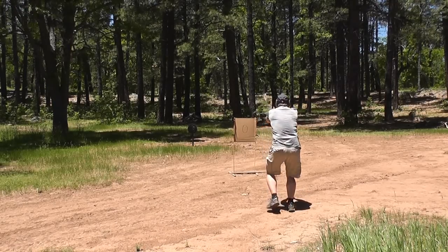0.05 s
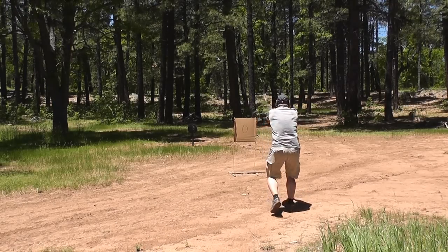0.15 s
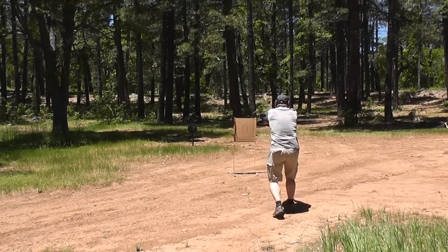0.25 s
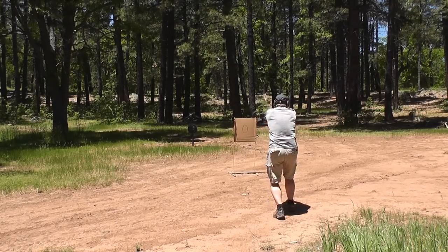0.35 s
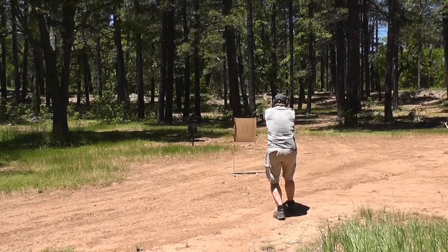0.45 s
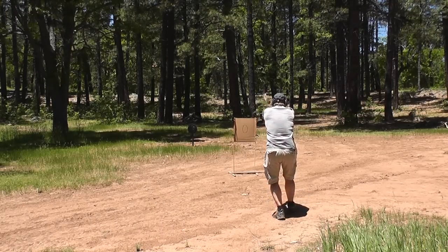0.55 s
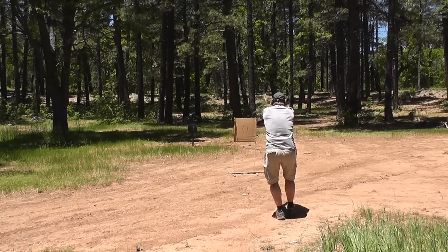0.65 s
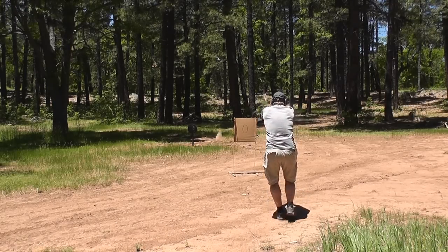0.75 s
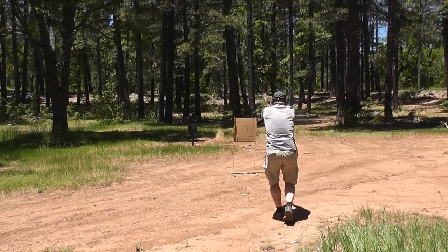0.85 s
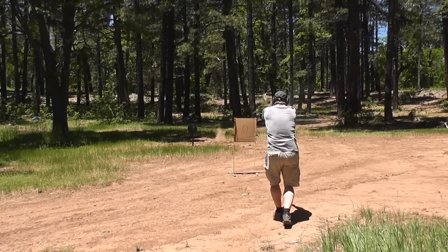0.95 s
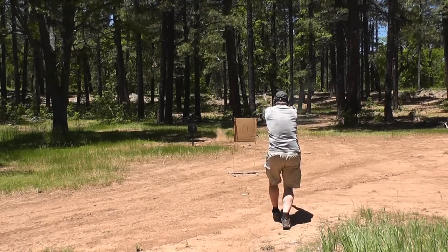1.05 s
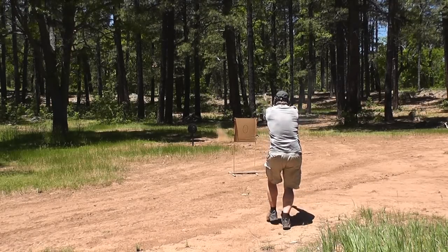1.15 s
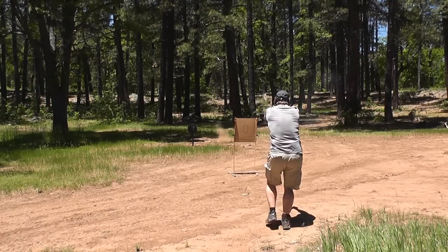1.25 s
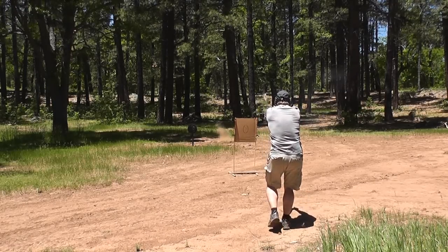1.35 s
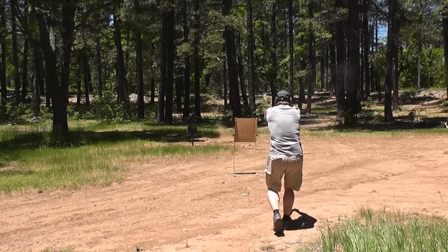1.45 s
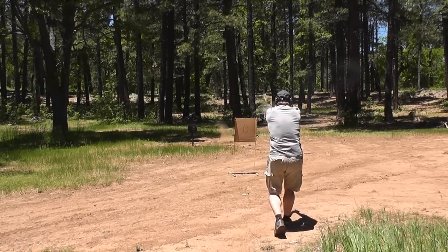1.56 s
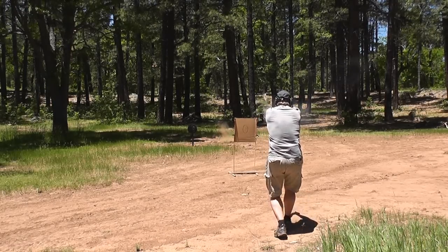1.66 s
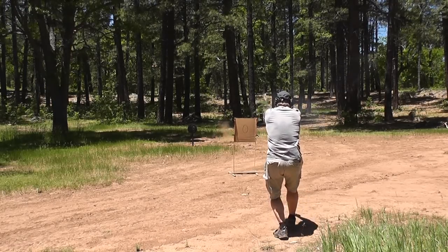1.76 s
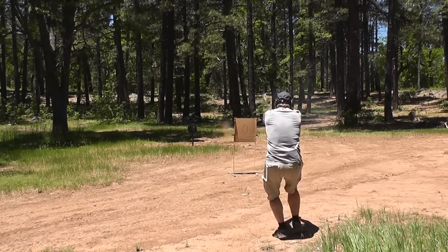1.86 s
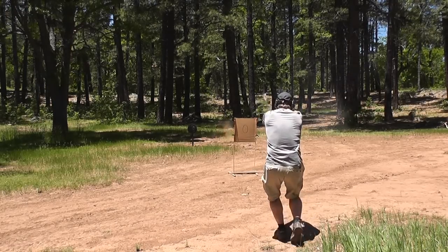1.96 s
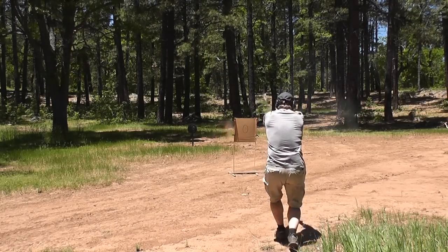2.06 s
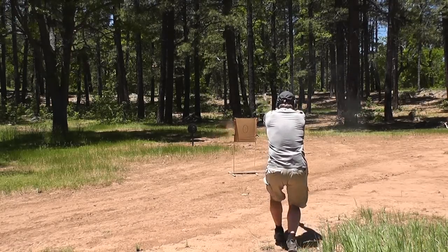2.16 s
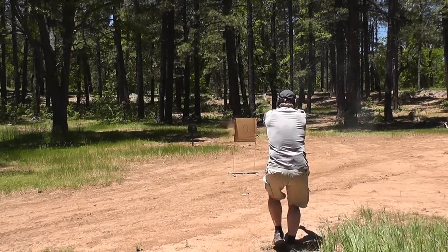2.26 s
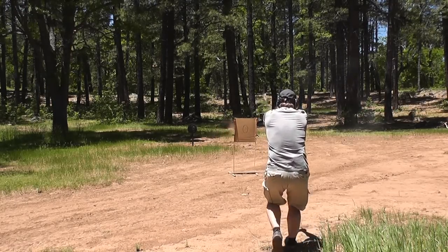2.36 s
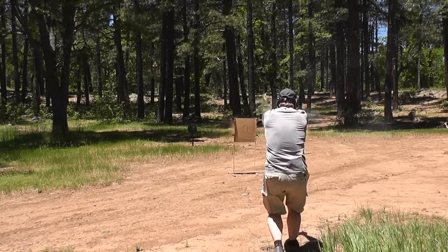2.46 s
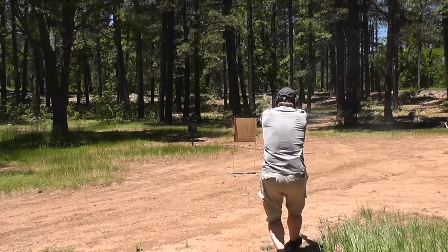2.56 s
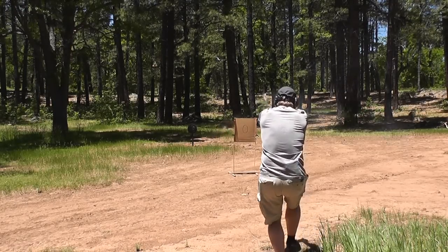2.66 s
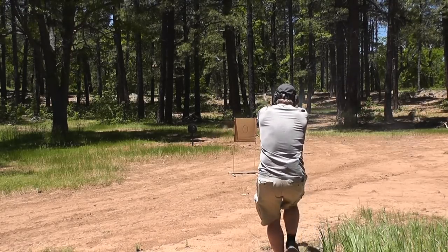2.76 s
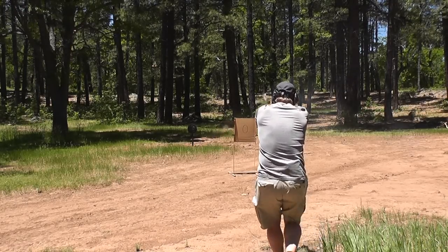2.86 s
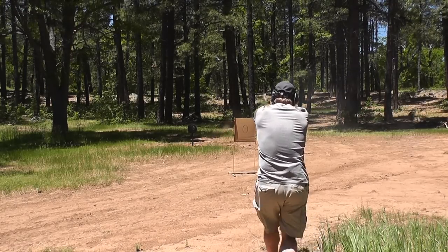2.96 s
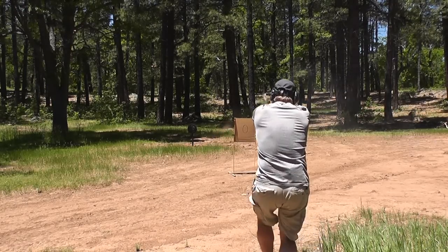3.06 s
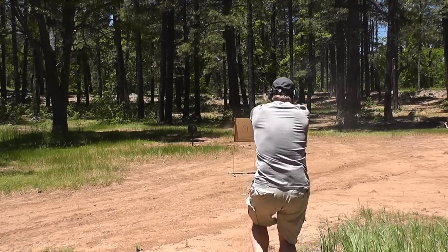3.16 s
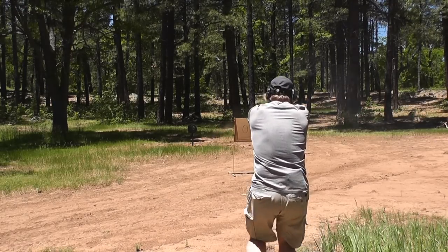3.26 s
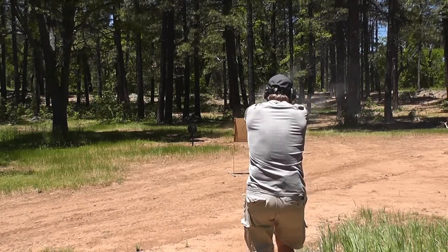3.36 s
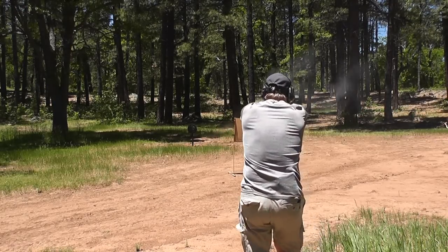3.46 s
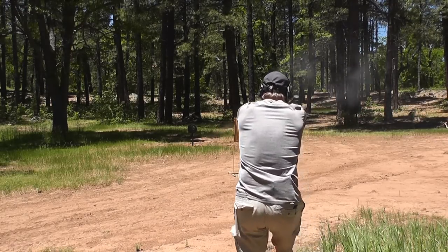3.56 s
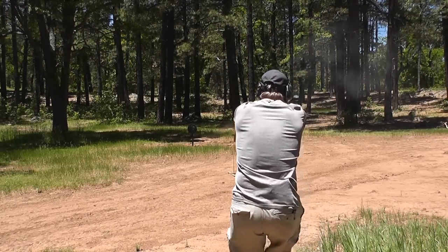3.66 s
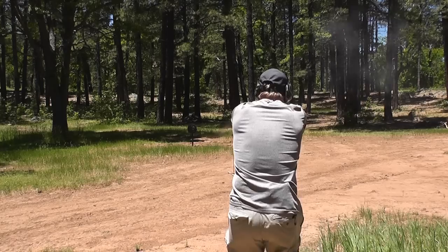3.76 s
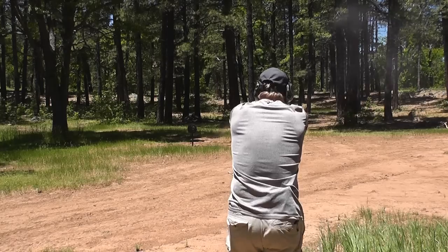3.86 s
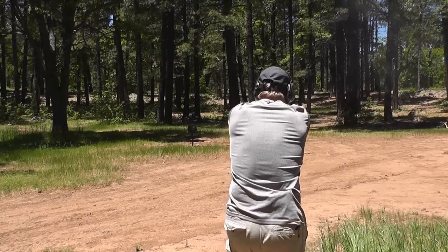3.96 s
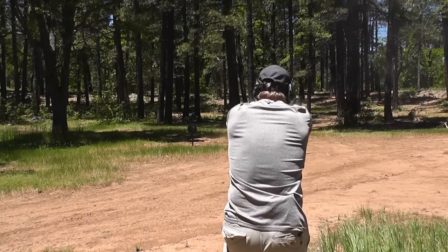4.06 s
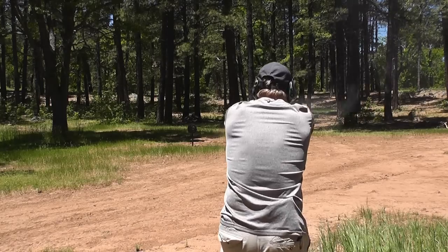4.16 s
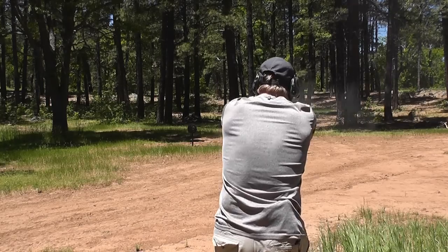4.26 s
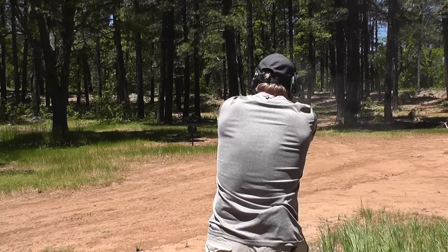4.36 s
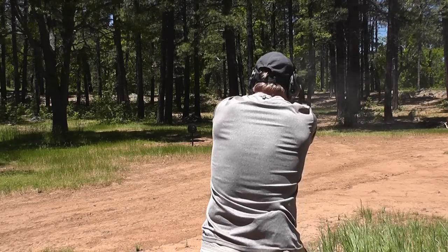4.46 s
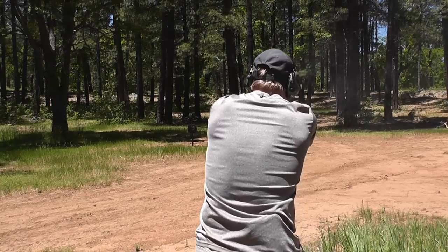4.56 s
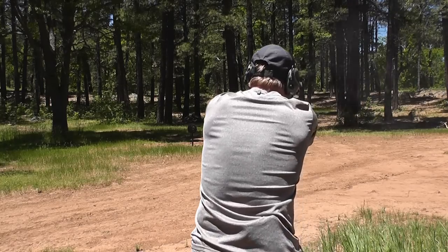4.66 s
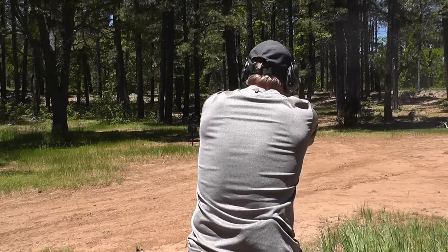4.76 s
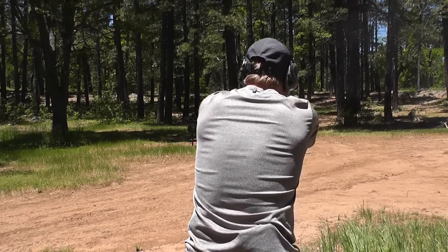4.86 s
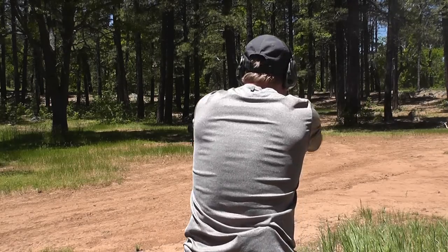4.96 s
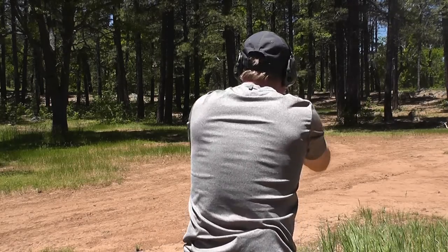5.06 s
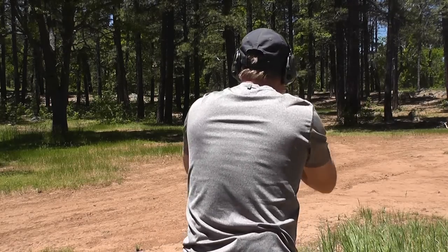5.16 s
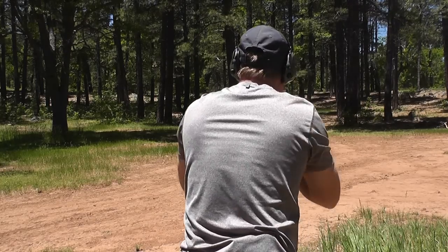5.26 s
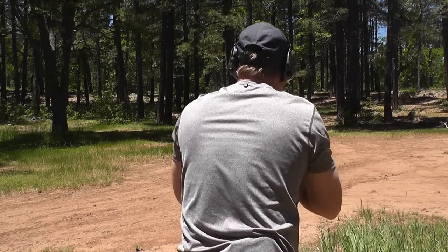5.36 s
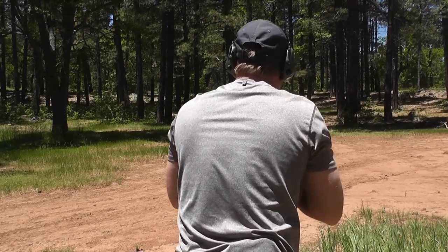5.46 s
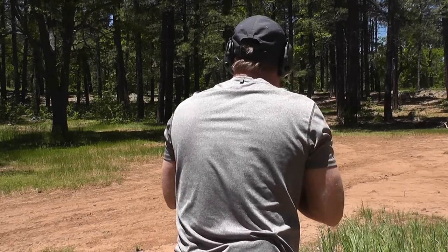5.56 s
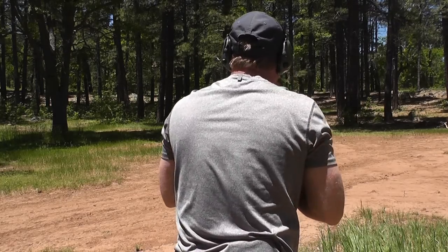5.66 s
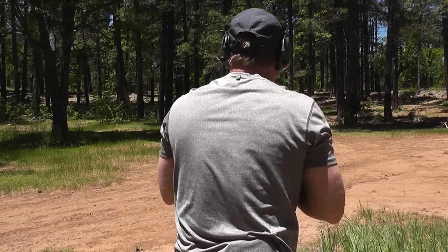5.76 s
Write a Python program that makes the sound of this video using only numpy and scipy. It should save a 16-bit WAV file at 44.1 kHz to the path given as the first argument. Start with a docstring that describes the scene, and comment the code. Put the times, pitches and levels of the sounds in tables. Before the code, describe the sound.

Five loud, evenly paced handgun shots crack outdoors and roll away through the trees, followed by soft steps on dirt and rustling clothes.

```python
"""A small revolver is fired five times by a man walking backwards over a dirt range in a pine forest.
Each blast overloads the microphone. The target board reflects it first; then the trunks scatter it
into a long roar, which darkens as air and ground absorb the treble. Between the shots his shoes
crush grit and his clothes rustle; a small bird twitters once over the wind in the trees."""
import sys
import numpy as np
from scipy import signal
from scipy.fft import rfft, irfft, next_fast_len
from scipy.io import wavfile
from scipy.ndimage import uniform_filter1d

SR = 44100
rng = np.random.default_rng(int(sys.argv[2]) if len(sys.argv) > 2 else 0)


def unload_wav(signal):
    """Save mono or channel-first audio to the path in sys.argv[1] as 16-bit WAV at rate SR, clipped to [-1, 1]."""
    wavfile.write(
        sys.argv[1],
        SR,
        np.round(np.clip(np.atleast_2d(signal).T, -1, 1) * 32767).astype(np.int16),
    )


N = 256088
SOUND_M_PER_S = 343
ECHO_LEAD_S = .003  # an echo's waveform begins this long before its centre

# Spectrum of rubbing grit and cloth. Each row: frequency in Hz, relative spectral level in dB.
FRICTION_SPECTRUM = [(300, -1), (1500, 10), (2500, 2), (4000, -6.5), (6200, 2), (8000, -4), (10000, -2),
                     (14000, -7.5), (16000, -11)]
# Stereo width of scattered sound. Each row: frequency in Hz, side level against mid in dB.
DIFFUSE_WIDTH = [(60, 18), (130, 6), (300, -12.5), (1000, -7.5), (2400, -8), (4400, -14.5), (8000, -31.5),
                 (14000, -1)]


def amp(db):
    return 10 ** (np.asarray(db) / 20)


def unit_rms(x):
    return x / np.sqrt(np.mean(x ** 2) + 1e-20)


def clock(seconds):
    return np.arange(int(seconds * SR)) / SR


def add(mix, start_s, sound):
    """Superposition: a mono or stereo sound sums into the mix."""
    part = mix[:, max(round(start_s * SR), 0):][:, :sound.shape[-1]]
    part += sound[..., :part.shape[1]]


def curve_at(points, hz):
    """Linear interpolation over log frequency."""
    knots_hz, values = np.transpose(points)
    return np.interp(np.log(hz + 1), np.log(knots_hz + 1), values)


def colour(x, spectrum):
    """Zero-phase filtering by a gain curve in dB."""
    size = next_fast_len(x.shape[-1] + 1024)
    gain = amp(curve_at(spectrum, np.fft.rfftfreq(size, 1 / SR)))
    return irfft(rfft(x, size) * gain, size)[..., :x.shape[-1]]


def band(x, low_hz, high_hz, order=2):
    """Causal band-pass filtering."""
    edges_hz = [low_hz, min(high_hz, SR / 2 - 500)]
    return signal.sosfilt(signal.butter(order, edges_hz, "band", fs=SR, output="sos"), x)


def spread(pair, width):
    """Mid-side stereo: the sum and difference of two unrelated signals give left and right."""
    mid, side = pair[0], colour(pair[1], width)
    return np.array([mid + side, mid - side])


def noise(samples, spectrum, width):
    """Partly coherent stereo noise of a given spectrum."""
    return colour(spread(rng.standard_normal((2, samples)), width), spectrum)


def snap(hz, fade_s):
    """A tiny fracture radiates a damped burst of noise around hz; peak 1."""
    t = clock(.02)
    wave = band(rng.standard_normal(len(t)) * np.exp(-t / fade_s), hz * .72, hz * 1.83)
    return wave / abs(wave).max()


def wind(buffet_db=-61.5, gust_db=13, gust_at_s=2.34, gust_width_s=.33, lump_db=3):
    """Turbulence: a steady rush in the pines, and light buffeting of the microphone with one gust."""
    # The rush. Each row: frequency in Hz, spectral level in dB.
    rush_spectrum = [(25, -72), (70, -46.5), (140, -35.5), (350, -31.5), (750, -29.5), (1200, -36.5),
                     (2000, -46.5), (3200, -51.5), (6000, -59.5), (10000, -65.5), (16000, -67.5)]
    # Its stereo width. Each row: frequency in Hz, side level against mid in dB.
    rush_width = [(60, 12), (200, -5), (500, -11.5), (4000, -11.5), (15000, -58)]
    t = np.arange(N) / SR
    lumps = unit_rms(band(rng.standard_normal(N), 8.2, 29, order=1))
    gust = np.exp(-((t - gust_at_s) / gust_width_s) ** 2)
    buffet = unit_rms(band(rng.standard_normal((2, N)), 82, 130, order=1))
    buffet *= amp(buffet_db + gust_db * gust + lump_db * lumps)
    return noise(N, rush_spectrum, rush_width) + buffet


def clothes(rustle_db=-86, growth_db_per_s=4.3, arms_db=-50, arms_at_s=4.95, fold_db=2, crackle_db=3):
    """Friction: cloth rubs in uneven folds, louder as he nears and most while he lowers his arms."""
    t = np.arange(N) / SR
    folds = unit_rms(band(rng.standard_normal(N), 5.6, 20, order=1))
    crackle = unit_rms(uniform_filter1d(rng.standard_normal(N), size=60))
    since = np.maximum(t - arms_at_s, 0)
    arms = np.minimum(since / .02, 1) / (1 + (since / .43) ** 6)
    motion = amp(rustle_db + growth_db_per_s * t) + amp(arms_db) * arms
    texture = amp(fold_db * folds + crackle_db * crackle)
    return noise(N, FRICTION_SPECTRUM, DIFFUSE_WIDTH) * motion * texture


def footsteps(grains_per_s=1000, crumble_s=.0002, sand=.25, width=.033, stone_hz=6000, stone_db=-41):
    """Impact and granular friction: each shoe lands softly and drags over grit; some pebbles snap."""
    # Steps on dirt. Each row: start in seconds, drag length in seconds, grit in dB, footfall in dB.
    steps = [(.326, .029, -43, -66), (0.582, 0.064, -54, -64), (2.079, 0.063, -36.5, -59),
             (2.201, 0.071, -52, -56), (2.991, 0.082, -44, -31), (3.21, 0.29, -45.5, -42),
             (3.884, 0.11, -42, -57), (4.617, .076, -47.5, -57), (4.79, 0.091, -51.5, -64),
             (5.681, 0.083, -41, -33.5)]
    # Pebbles snapping underfoot. Each row: start in seconds, relative level in dB.
    pebbles = [(0.4614, -43), (1.1238, -36), (1.458, -26.5), (1.604, -36), (2.9963, -31), (3.7494, -25.5),
               (3.784, -25.5), (3.963, -32), (4.6838, -32.5), (4.778, -33.5), (4.9498, -28), (5.1826, -30),
               (5.3063, -27.5), (5.476, -32), (5.7557, -32)]
    out = np.zeros((2, N))
    t = clock(.4)
    for start, length, grit_db, footfall_db in steps:
        sizes = amp(4.8 * np.minimum(rng.exponential(1, len(t)), 4))
        grains = sizes * (rng.random(len(t)) < grains_per_s / SR)
        # each grain crumbles briefly over a hiss of fine sand
        crumbs = signal.lfilter([1], [1, -np.exp(-1 / (crumble_s * SR))], grains)
        crunch = rng.standard_normal((2, len(t))) * (crumbs + sand)
        mid, side = unit_rms(colour(crunch, FRICTION_SPECTRUM))
        drag = np.minimum(t / (.15 * length), 1) / (1 + (t / length) ** 4)
        add(out, start, amp(grit_db) * drag * np.array([mid + width * side, mid - width * side]))
        thud = unit_rms(band(rng.standard_normal(len(t)), 150, 380))
        add(out, start, amp(footfall_db) * thud * np.minimum(t / .005, 1) * np.exp(-t / .016))
        # two kicked stones tick down soon after
        for flight_s, offset_db in zip(rng.uniform(0, .25, 2), rng.normal(0, 2, 2)):
            add(out, start + flight_s, amp(stone_db + offset_db) * snap(stone_hz, fade_s=.0017))
    for start, db in pebbles:
        add(out, start, amp(db - 1) * snap(stone_hz * rng.uniform(.93, .94), fade_s=.0016))
    return out


def bird(chips=8, chip_s=.016, sweep=.16):
    """Frequency modulation: each chip is a pure tone that sweeps up and levels off."""
    # The contour of the twitter. Each row: time in seconds, pitch in Hz, level in dB.
    contour = [(.547, 4150, -51), (.57, 5800, -57), (.617, 5500, -58), (.713, 4300, -46)]
    times, pitches, levels = np.transpose(contour)
    out = np.zeros((2, N))
    progress = clock(chip_s) / chip_s
    for start in np.linspace(times[0], times[-1], chips):
        hz = np.interp(start, times, pitches) * (1 - sweep * (1 - progress) ** 2)
        envelope = amp(np.interp(start, times, levels)) * np.sin(np.pi * progress)
        add(out, start, envelope * np.sin(2 * np.pi * np.cumsum(hz) / SR))
    return out


def blast(punch_db, punch_hz, thump_db, scatter_db, hold_s=.0073, thump_hz=115, ceiling=.75):
    """Saturation: a few ms of violent pressure overload the microphone, which swings back in a thump."""
    # The muzzle's crack. Each row: frequency in Hz, relative spectral level in dB.
    crack_spectrum = [(40, -15), (130, -9), (300, -5), (600, -1), (1200, -2), (2400, -9.5), (4000, -7.5),
                      (6200, -7.5), (11000, -13), (16000, -22)]
    # Its stereo width. Each row: frequency in Hz, side level against mid in dB.
    crack_width = [(60, -10), (160, -6), (350, 0), (800, -1), (3000, -4), (5500, -18), (15000, -13)]
    # Scatter from the nearby ground. Each row: frequency in Hz, relative spectral level in dB.
    ground_spectrum = [(50, -17), (200, -29), (500, 1.5), (1200, -3.5), (2400, -10), (6000, -22),
                       (12000, -32.5), (16000, -17)]
    t = clock(.11)
    burst = 1 / (1 + (t / hold_s) ** 12)
    gas_rasp = amp(-11) * np.exp(-np.maximum(t - hold_s, 0) / .014)  # hot gas escapes
    crack = amp(-3.5) * noise(len(t), crack_spectrum, crack_width) * np.maximum(burst, gas_rasp)
    # the pressure wave rocks the two microphone ports out of step, the right one harder
    from_punch = t - .0035
    phase = 2 * np.pi * punch_hz * from_punch
    ports = np.array([amp(-6) * np.sin(phase), np.cos(phase)])
    punch = amp(punch_db) * ports * np.exp(-(from_punch / .0025) ** 2)
    since_thump = np.maximum(t - .00424, 0)
    thump = -amp(thump_db) * np.sin(2 * np.pi * thump_hz * since_thump) * np.exp(-since_thump / .003)
    scatter = amp(scatter_db) * noise(len(t), ground_spectrum, DIFFUSE_WIDTH) * np.exp(-t / .016)
    pressure = (crack + punch + thump + scatter) * np.minimum(t / .001, 1)
    return band(ceiling * np.tanh(pressure / ceiling), 48, 21000, order=1)


def round_trip(metres):
    """Echo delay in seconds: sound travels to the reflector and back."""
    return 2 * metres / SOUND_M_PER_S


def echo(hz, width_s, roughness, fade_s=.002):
    """Reflection from a rough surface: one swing of pressure, trailed by diffuse scatter."""
    t = clock(.02) - ECHO_LEAD_S
    phase = 2 * np.pi * hz * rng.uniform(.85, 1.15) * t + rng.uniform(0, 2 * np.pi)
    swing = np.exp(-(t / width_s) ** 2) * np.cos(phase)
    scatter = rng.standard_normal(len(t)) * np.exp(-abs(t) / fade_s) * (t > 0)
    trail = band(scatter, hz * .55, hz * 1.5, order=4)
    return swing + roughness * trail / abs(trail).max()


def target_board(out, shot_s, back_m, smack_db, first_range_m=3.29, bullet_m_per_s=242):
    """Time of flight: the board's echo returns before the smack of the subsonic bullet."""
    range_m = first_range_m + back_m
    slap = amp(-2.5 - 1.8 * back_m) * echo(hz=1150, width_s=.0008, roughness=.45)
    add(out, shot_s + round_trip(range_m) - ECHO_LEAD_S, slap)
    hit_s = shot_s + range_m / bullet_m_per_s
    add(out, hit_s + range_m / SOUND_M_PER_S, amp(smack_db) * snap(hz=7450, fade_s=.00056))


def big_trunks(out, shot_s, back_m):
    """Discrete reflections: each big trunk returns one echo, delayed by its distance."""
    # The trunks. Each row: distance at the first shot in metres, fraction of his retreat that adds
    # to it, level in dB, left minus right in dB.
    trunks = [(13.27, .72, -12, 4.5), (14.35, .93, -11, 2), (23.87, 1, -8.5, 0), (27.3, 1, -9, 0),
              (33.9, .95, -12.5, -4), (38.85, 1, -8.5, -3), (45.72, .85, -10.5, 5), (58.03, .85, -14.5, 3),
              (59.56, .89, -11, 2)]
    for first_range_m, share, db, pan_db in trunks:
        delay_s = round_trip(first_range_m + share * back_m)
        gains = amp(db + np.array([[pan_db], [-pan_db]]) / 2)
        add(out, shot_s + delay_s - ECHO_LEAD_S, gains * echo(hz=1300, width_s=.0005, roughness=.4))


def forest_roar(trunks_per_s=2500, trunk_share=.32, treeline_s=.07, hold_s=1, fade_db_per_s=21.5):
    """Reverberation: trunks and foliage scatter countless echoes; absorption darkens the later ones."""
    # The colour of the roar. Each row: frequency in Hz, relative spectral level in dB.
    roar_spectrum = [(50, -85), (100, -36.5), (170, -23), (330, -19), (600, -14.5), (1200, -13.5),
                     (1750, -15.5), (2430, -24), (3000, -16.5), (5300, -21.5), (9000, -25.5), (12500, -26),
                     (16000, -41)]
    # Absorption by air and ground. Each row: frequency in Hz, loss in dB per second.
    absorption = [(150, 16.7), (330, 14.1), (650, 0.11), (1200, 2.15), (2000, 11.2), (3100, 23.3),
                  (5300, 58.3), (9000, 89), (14000, 134)]
    t = clock(2.4)
    trunks = rng.standard_normal((2, len(t))) * (rng.random(len(t)) < trunks_per_s / SR)
    foliage = rng.standard_normal((2, len(t)))
    echoes = np.sqrt(trunk_share) * unit_rms(trunks) + np.sqrt(1 - trunk_share) * foliage
    # trees stand in clumps, so the near echoes come in lumps
    clumps_db = unit_rms(uniform_filter1d(rng.standard_normal(len(t)), size=300)) * np.exp(-t / .45)
    echoes = spread(echoes * amp(clumps_db), DIFFUSE_WIDTH)
    hz, delay_s, spectra = signal.stft(echoes, SR, nperseg=512, noverlap=384)
    loss_db = curve_at(absorption, hz)[:, None] * delay_s
    _, darkened = signal.istft(spectra * amp(-loss_db), SR, nperseg=512, noverlap=384)
    # faint over the clearing, the roar leaps as the front row of trees answers all at once
    attack_db = np.interp(t - treeline_s, [0, .013, .033], [-10, 6.5, 2])
    release_db = fade_db_per_s * (np.hypot(t, hold_s) - hold_s)
    return colour(darkened[:, :len(t)], roar_spectrum) * amp(attack_db - release_db)


def far_bank(db=-39, delay_s=.2, width_s=.055):
    """Diffuse reflection: the rising ground behind the trees returns a dull, drawn-out thud."""
    t = clock(.5)
    rumble = unit_rms(band(rng.standard_normal(len(t)), 125, 225))
    return amp(db) * rumble * np.exp(-((t - delay_s) / width_s) ** 2)


def gunfire():
    """Direct sound, then reflections, which arrive later as he backs away and their paths lengthen."""
    # The shots. Each row: start in seconds, retreat since the first shot in metres, punch level in dB,
    # punch frequency in Hz, thump level in dB, level of the bullet's smack in dB.
    shots = [(.7281, 0, -12, 540, -5.5, -18), (1.6406, .62, -15, 500, -5.5, -14),
             (2.4851, 1.58, -9, 290, -4.5, -9), (3.3914, 2.78, -8, 360, -10, -15),
             (4.1720, 3.64, -4, 300, -7, -17)]
    out = np.zeros((2, N))
    for start, back_m, punch_db, punch_hz, thump_db, smack_db in shots:
        add(out, start, blast(punch_db, punch_hz, thump_db, scatter_db=-1.5 - .66 * back_m))
        target_board(out, start, back_m, smack_db)
        big_trunks(out, start, back_m)
        extra_delay_s = round_trip(.7 * back_m)
        add(out, start + extra_delay_s, forest_roar())
        add(out, start + extra_delay_s, far_bank())
    return out


def scene():
    """Superposition: the pressures of all the sources add."""
    return gunfire() + footsteps() + bird() + wind() + clothes()


def record(dry, threshold_db=-20, slope=.95, lag_s=.014, recovery_db_per_s=45, cutoff_hz=15950):
    """Automatic gain control ducks after each blast and recovers amid the echoes; a low-pass follows."""
    power = signal.lfilter(np.ones(400) / 400, [1], (dry ** 2).mean(0))
    level_db = 10 * np.log10(power + 1e-12)
    recovery_db = np.arange(N) * recovery_db_per_s / SR
    held_db = np.maximum.accumulate(level_db + recovery_db) - recovery_db
    excess_db = np.maximum(held_db - threshold_db, 0)
    pole = np.exp(-1 / (lag_s * SR))
    ducked = dry * amp(-slope * signal.lfilter([1 - pole], [1, -pole], excess_db))
    low_pass = signal.firwin(301, cutoff_hz, window=("kaiser", 8), fs=SR)
    return signal.oaconvolve(ducked, low_pass[None], "same")


dry = scene()
out = record(dry)
unload_wav(out)
```